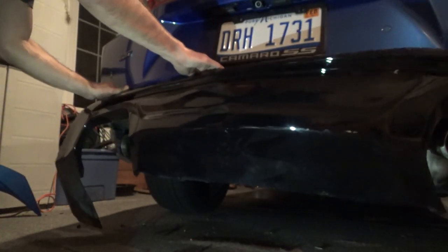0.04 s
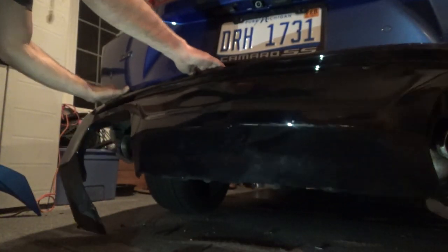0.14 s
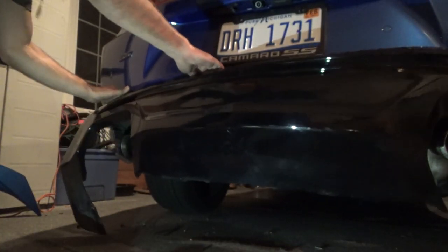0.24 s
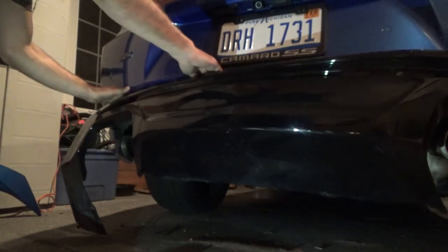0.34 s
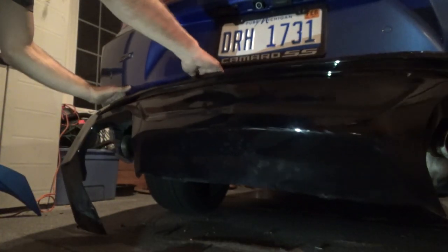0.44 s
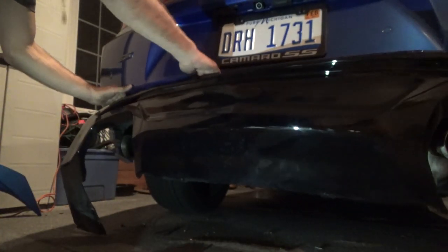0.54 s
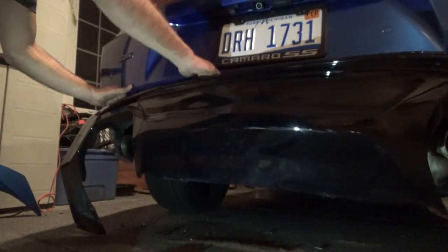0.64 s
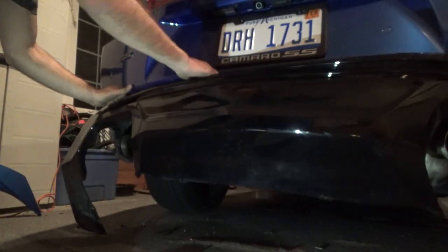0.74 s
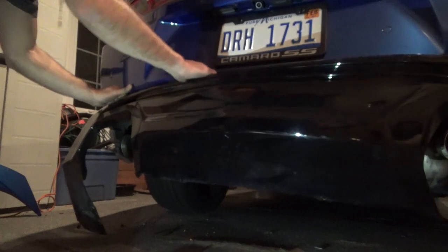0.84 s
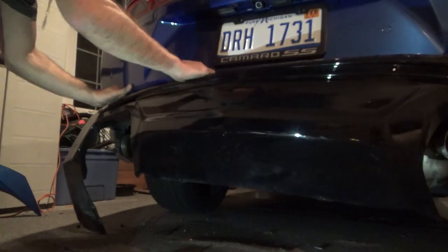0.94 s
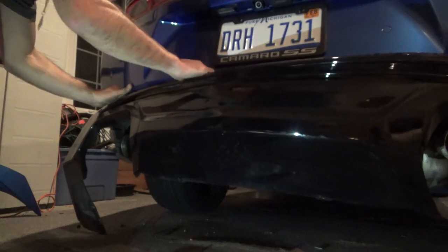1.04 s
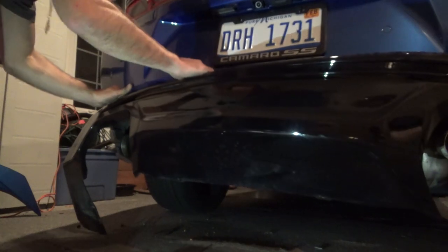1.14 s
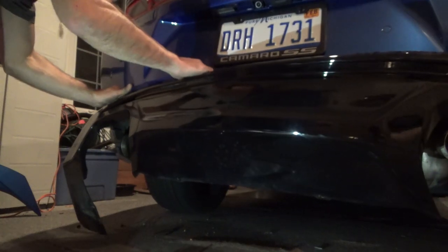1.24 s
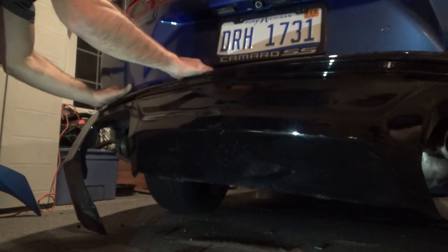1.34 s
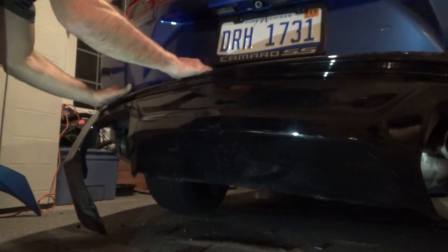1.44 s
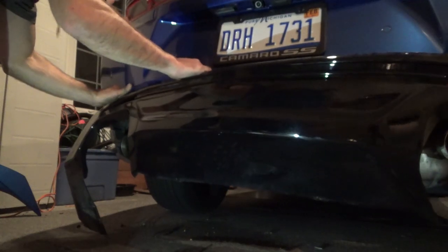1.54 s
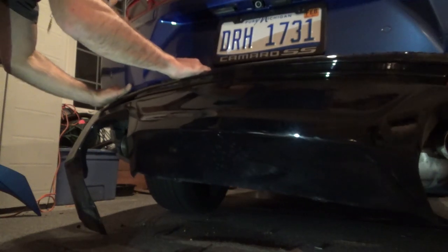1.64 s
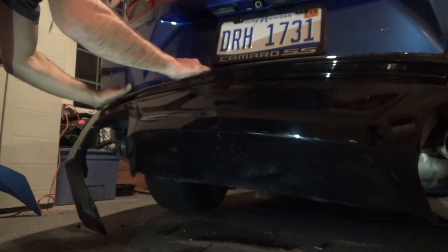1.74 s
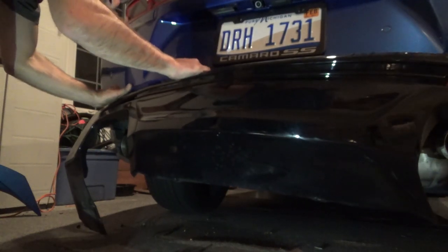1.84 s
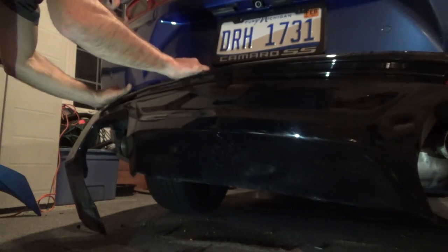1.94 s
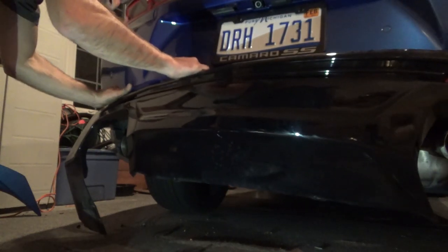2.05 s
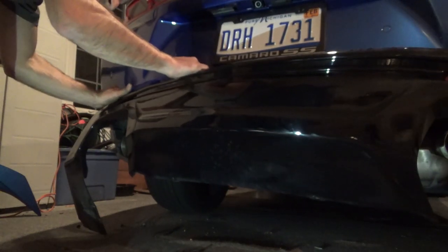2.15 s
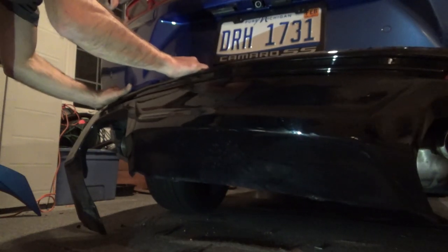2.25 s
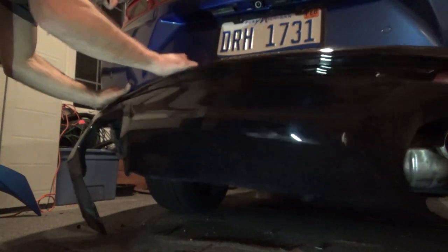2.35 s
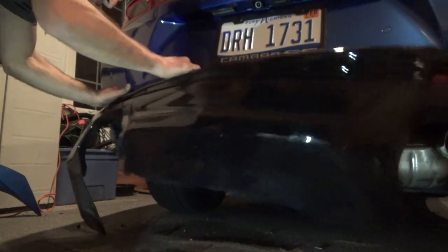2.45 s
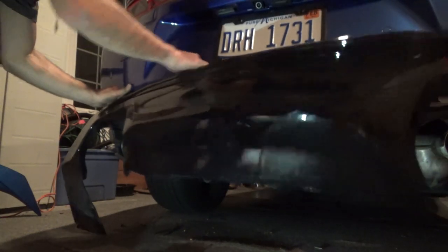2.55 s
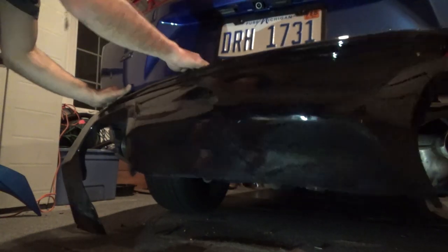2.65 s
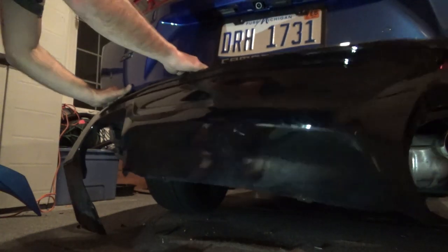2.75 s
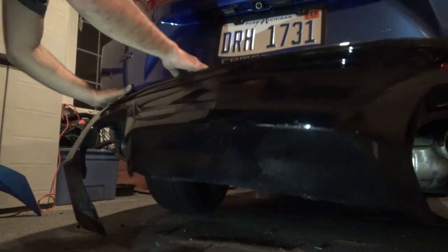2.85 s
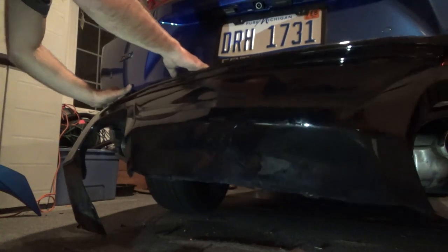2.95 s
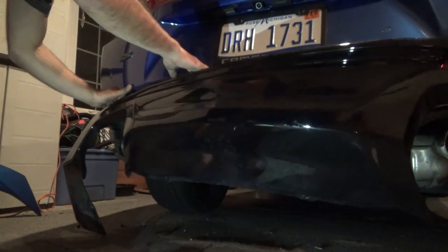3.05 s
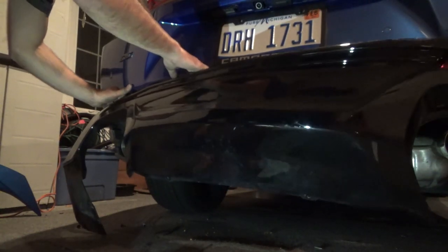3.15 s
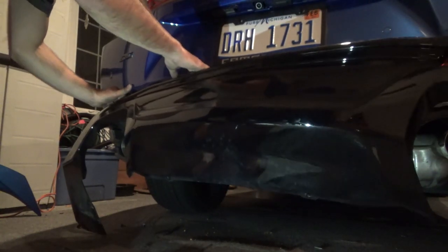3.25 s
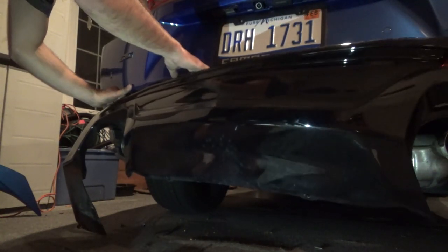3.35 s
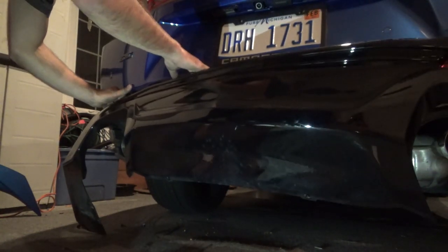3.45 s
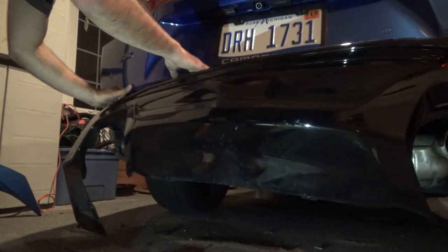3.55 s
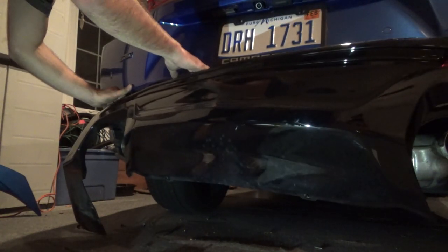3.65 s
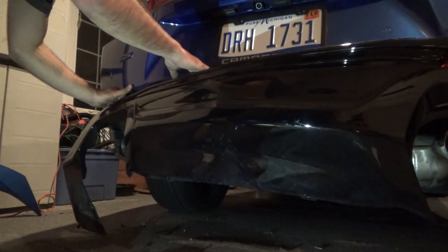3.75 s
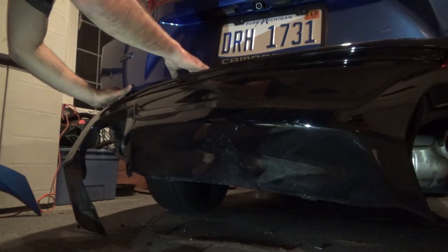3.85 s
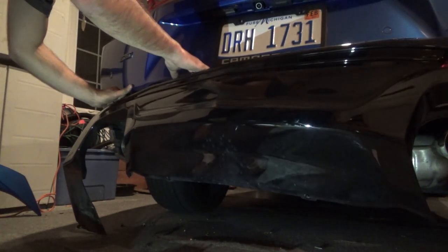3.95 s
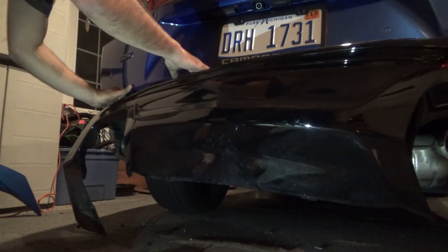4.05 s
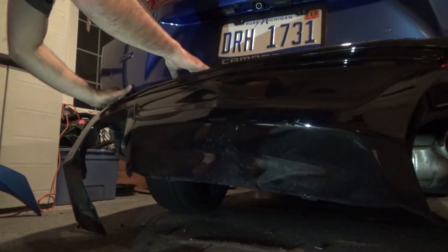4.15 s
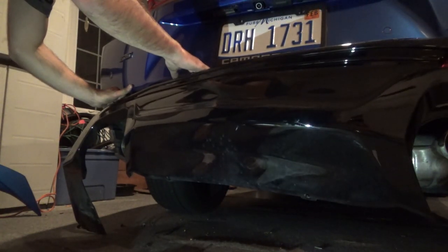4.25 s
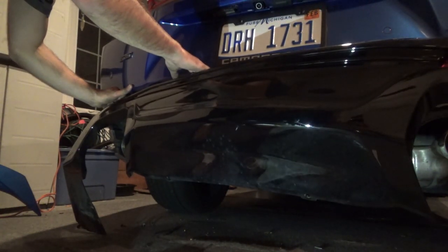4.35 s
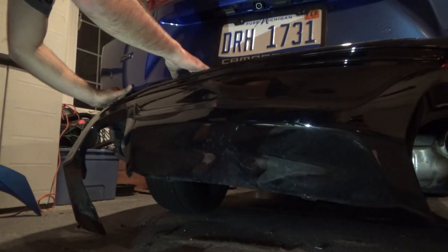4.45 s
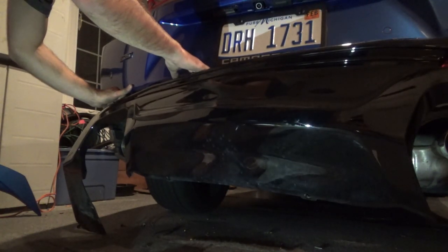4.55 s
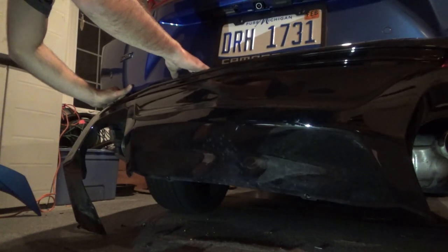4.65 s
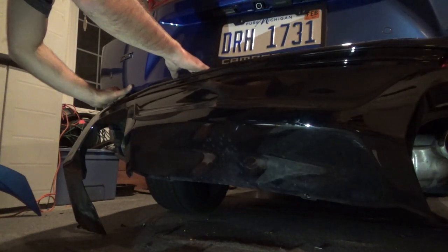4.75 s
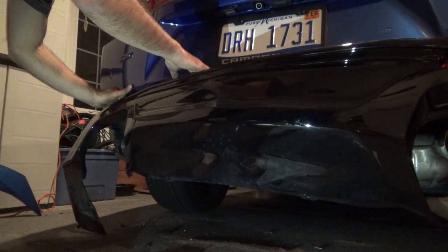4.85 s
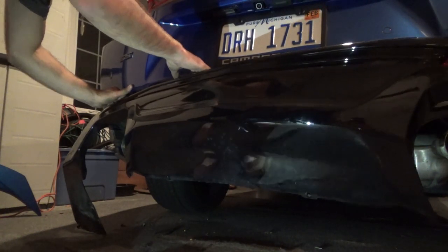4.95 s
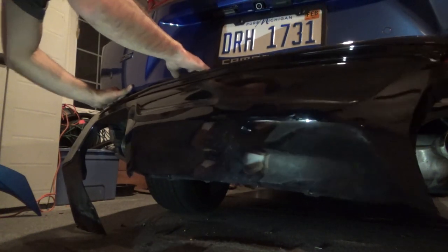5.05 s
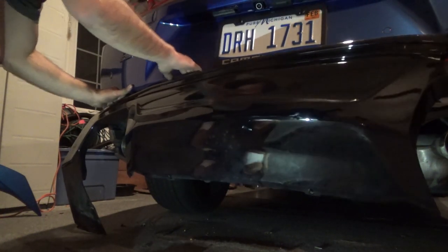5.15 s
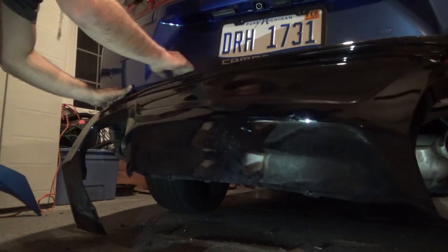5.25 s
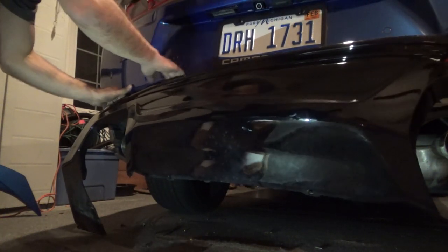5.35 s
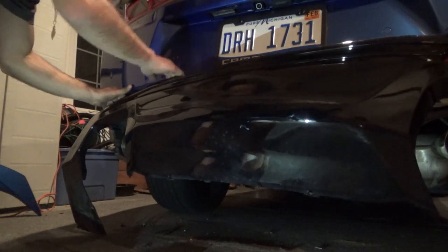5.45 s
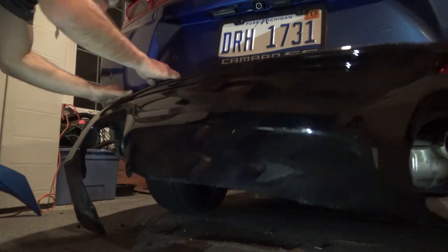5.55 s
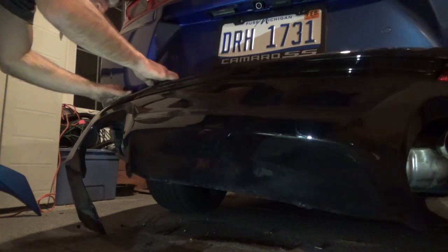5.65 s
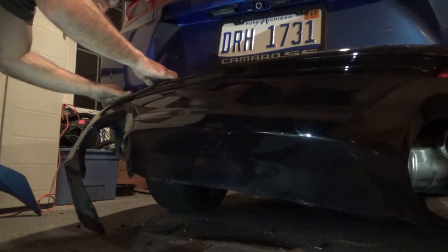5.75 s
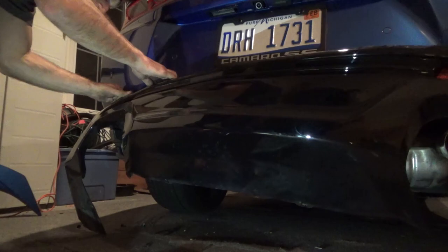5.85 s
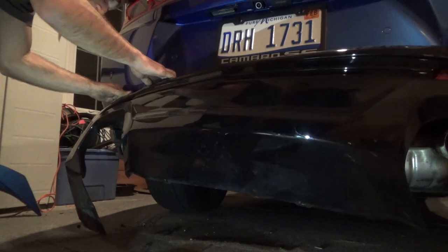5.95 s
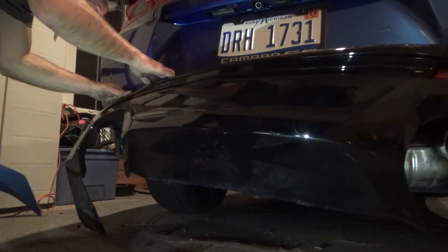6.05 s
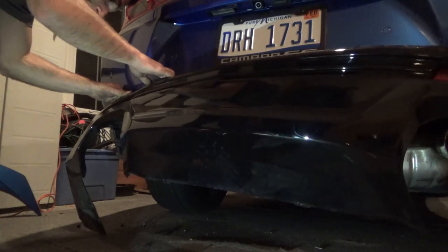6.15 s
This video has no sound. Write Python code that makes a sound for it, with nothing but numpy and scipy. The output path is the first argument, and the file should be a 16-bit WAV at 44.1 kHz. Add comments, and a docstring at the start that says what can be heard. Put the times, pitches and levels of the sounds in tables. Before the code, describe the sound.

Small creaks, hollow knocks and the rub of palms come from a nearby plastic bumper being worked off a car. A soft thump comes before a loud snap with a short boom and a quick slap. About two quiet seconds pass before more light knocking and scraping. The garage adds a short echo, with low room noise, a hum and very faint rapid chirping.

```python
"""A plastic bumper cover is worked loose by hand in a garage. Hands slide over it, the skin flexes with
soft booms, and its edge creaks, knocks and scrapes on the body. A row of clips lets go in one loud
snap: the skin pops and booms, the panel shudders and slaps back. Lighter handling follows.
Behind it sit quiet room noise, a hum and a faint, fast, regular chirping."""
import sys
import numpy as np
from scipy import signal
from scipy.fft import rfft, irfft
from scipy.io import wavfile

SR = 44100
rng = np.random.default_rng(int(sys.argv[2]) if len(sys.argv) > 2 else 0)


def store_wav(level_fs):
    """Save 16-bit WAV to argv[1]."""
    pcm = np.round(np.clip(np.atleast_2d(level_fs), -1, 1) * 32767)
    wavfile.write(sys.argv[1], SR, pcm.T.astype(np.int16))


N = 273420

# the five ranges in which the panel rings: low/Hz, high/Hz, relative ring time
RING_RANGES = [(145, 437, 1.5), (395, 1010, 0.86), (1100, 2960, .92), (3100, 6640, 0.88),
               (6490, 14000, 1.17)]


def from_db(db):
    """Decibels to gain."""
    return 10 ** (np.asarray(db) / 20)


def rms_one(x):
    """Scale to unit rms."""
    return x / np.sqrt(np.mean(x ** 2) + 1e-20)


def band(x, low, high):
    """Band-pass that keeps the power of white noise."""
    sos = signal.butter(3, [low, high], "band", fs=SR, output="sos")
    return signal.sosfilt(sos, x + 1e-18) * np.sqrt(SR / 2 / (high - low))


def resonate(x, hz, width_hz):
    """One resonance with unity gain at its peak."""
    r = np.exp(-np.pi * width_hz / SR)
    feedback = [1, -2 * r * np.cos(2 * np.pi * hz / SR), r * r]
    return signal.lfilter(np.array([1, 0, -1]) * (1 - r * r) / 2, feedback, x)


def narrow_noise(hz, width_hz):
    """A wavering tone of twice-resonated noise; rms 1."""
    return rms_one(resonate(resonate(rng.standard_normal(N), hz, width_hz), hz, width_hz))


def at_hz(points, hz):
    """Read a curve on a log-frequency axis."""
    freqs, values = np.transpose(points)
    return np.interp(np.log(hz + 1), np.log(freqs), values)


def stereo(mid, side, alike):
    """Two channels of a given likeness (-1 to 1) from two unrelated signals."""
    alike = np.clip(alike, -1, 1)
    return (np.sqrt(1 + alike) * mid + np.sqrt(1 - alike) * side * np.array([[1], [-1]])) / np.sqrt(2)


def add(track, s, sound):
    """Mix a sound into a track at time s."""
    at = max(round(s * SR), 0)
    track[..., at:at + sound.shape[-1]] += sound[..., :N - at]


def grains(per_s, spread_db, smooth):
    """Tiny slips of uneven size over a share of smooth friction noise; rms 1."""
    slips = (rng.random(N) < per_s / SR) * rng.choice([-1, 1], N)
    sizes = from_db(spread_db * np.clip(rng.standard_normal(N), -2, 2))
    return rms_one(rms_one(slips * sizes) + smooth * rng.standard_normal(N))


def tint(kind, k, tilt):
    """Level in dB of ring range k: the colour of the contact, tilted in dB per octave about 1800 Hz."""
    # colour of each kind of contact: level/dB in each ring range, low to high
    colours = {"click": (-7, 3, -1, -4, 0.5), "knock": (-2, -1, -21.5, -13.5, -20),
               "creak": (-3, -6, 0.5, -14.5, -24), "snap": (-1, 0.5, -1, -2.5, -3.3),
               "slap": (-5, 1, 1.5, -8, -17), "rub": (3, 2, -0.5, -1.5, -2)}
    low, high, _ = RING_RANGES[k]
    return colours[kind][k] + tilt * np.log2(np.sqrt(low * high) / 1800)


def strikes(hits, kind, ring_s, crack_s, buzz_per_s, smooth, damping):
    """Each blow is a sharp crack, then the dying buzz of the plastic; damping dries the treble most."""
    out, t = np.zeros(N), np.arange(SR // 2) / SR
    for k, (low, high, ring) in enumerate(RING_RANGES):
        power, cracks = np.zeros(N), np.zeros(N)
        t60 = ring_s * ring / (1 + damping * low / RING_RANGES[-1][0])
        for s, level_db, tilt in hits:
            gain = from_db(level_db + tint(kind, k, tilt))
            add(power, s, gain ** 2 * np.exp(-2 * np.log(1000) * t / t60))
            add(cracks, s, np.array([gain * np.sqrt(crack_s * SR)]))   # the energy of crack_s of buzz
        buzz = np.sqrt(power) * grains(buzz_per_s, 2.0, smooth)
        out += band(buzz + cracks, low, high)
    return out


def swings(bends, octave_db):
    """The skin swings for a few cycles, damped by the hands; bending adds a weak octave."""
    out, t = np.zeros(N), np.arange(SR // 10) / SR
    for s, peak_db, hz, length_s in bends:
        swell = np.sin(np.pi * np.minimum(t / length_s, 1))
        phase = 2 * np.pi * hz * t
        tone = np.sin(phase) + from_db(octave_db) * np.sin(2 * phase)
        add(out, s, -from_db(peak_db) * swell * tone)
    return out


def room_noise():
    """A steady bed of air and hiss, with a hum and a few thin whines."""
    # spectrum of the air: f/Hz, relative level/dB
    air_curve = [(15, -22.5), (45, -7), (80, -4), (250, -1.5), (600, -5), (1200, -5), (2000, -10),
                 (3500, -11.5), (5000, -15), (9000, -17.5), (15500, -22.5)]
    # stereo image of the air: f/Hz, left-right likeness
    likeness = [(60, 0.98), (180, 0.98), (550, 0.18), (1650, 0.2), (4970, 0.43), (15000, 1)]
    # hum and whines: f/Hz, width/Hz, level/dB
    tones = [(149.9, 8, -76), (924, 17, -86.5), (1131, 25, -78), (1440, 28, -85), (1580, 25, -88.5),
             (7100, 400, -81)]
    hz = np.arange(N // 2 + 1) * SR / N
    white = stereo(*rfft(rng.standard_normal((2, N))), at_hz(likeness, hz))
    air = rms_one(irfft(white * from_db(at_hz(air_curve, hz)), N))
    hum = sum(from_db(db) * narrow_noise(f, width) for f, width, db in tones)
    return from_db(-63) * air + hum


def chirp(hz, glide_hz, glide_s, length_s):
    """One tiny chirp that falls onto its pitch."""
    t = np.arange(SR // 50) / SR
    phase = 2 * np.pi * np.cumsum(hz + glide_hz * np.exp(-t / glide_s)) / SR
    return np.sin(phase) * np.sin(np.pi * np.minimum(t / length_s, 1)) ** 2


def chirping(per_s, skip_chance):
    """Regular chirps, each led in by a fainter, higher flick; now and then only the flick sounds."""
    out = np.zeros(N)
    tone = from_db(-58.5) * chirp(hz=3336, glide_hz=700, glide_s=.001, length_s=.013)
    flick = from_db(-65) * chirp(hz=3800, glide_hz=200, glide_s=.0041, length_s=.0053)
    for s in np.arange(.0097, N / SR, 1 / per_s):
        add(out, s, tone * (rng.random() > skip_chance) + flick * from_db(rng.normal(0, 2.7)))
    return out


def clip_clicks():
    """The clips click, sharp and dry."""
    # clicks: t/s, level/dB, tilt/(dB per octave)
    hits = [(0.0465, -41.5, -0.2), (0.213, -63, 0), (0.378, -56.5, 0), (1.749, -59, 1.8), (2.705, -62, 2),
            (5.0525, -54, 0.3), (5.07, -71, -1), (5.082, -50.5, -1.2), (5.2435, -52, -1.5)]
    return strikes(hits, "click", ring_s=.024, crack_s=.0012, buzz_per_s=1500, smooth=.58, damping=.82)


def scrapes(rise_s, fall_s, slips_per_s):
    """Stick-slip strokes over light rubbing: a rasp below, the smoother hiss of palms on paint on top."""
    # strokes of palms and plastic edges: t/s, length/s, level/dB, tilt/(dB per octave)
    strokes = [(0.325, 0.02, -52.5, 2.1), (0.383, 0.031, -60.5, -3), (0.449, 0.038, -54.5, 1.7),
               (0.533, 0.046, -63, 1.8), (0.649, 0.04, -59.5, 1.2), (0.715, 0.042, -61.5, -1),
               (1.577, 0.051, -62, -2), (2.899, 0.035, -73, 3.5), (5.123, 0.055, -73.5, 3.2),
               (5.325, 0.055, -67, 4), (5.375, 0.026, -59, 0.1), (5.446, 0.042, -62, 0),
               (5.544, 0.033, -59, -2.5), (5.615, 0.035, -62, -3.5)]
    # rubbing of the pressing hands, one curve before the snap and one after: t/s, level/dB
    grip_curves = [
        [(0.05, -86), (0.2, -65.5), (0.62, -69), (0.8, -62.5), (0.92, -71), (1.06, -70), (1.25, -88)],
        [(4.95, -78.5), (5.4, -71.5), (5.67, -70.5), (5.75, -84)],
    ]
    out, t = np.zeros(N), np.arange(SR // 4) / SR
    rasp, hiss = grains(slips_per_s, 3.4, smooth=.39), grains(4000, 3.0, smooth=1.0)
    grip = sum(np.interp(np.arange(N) / SR, s, from_db(db), left=0, right=0)
               for s, db in map(np.transpose, grip_curves))
    for k, (low, high, _) in enumerate(RING_RANGES):
        stroking = np.zeros(N)
        for s, length_s, level_db, tilt in strokes:
            envelope = (1 - np.exp(-t / rise_s)) * np.exp(-np.maximum(t - length_s, 0) / fall_s)
            add(stroking, s, from_db(level_db + tint("rub", k, tilt)) * envelope)
        pressure = np.hypot(stroking, grip * from_db(tint("rub", k, tilt=-.5)))
        friction = hiss if k == len(RING_RANGES) - 1 else rasp
        out += band(pressure * friction, low, high)
    return out


def skin_flexes(hz, length_s):
    """The skin flexes with soft booms, always at its own pitch."""
    # flexes: t/s, level/dB
    bends = [(0.054, -46), (0.302, -39), (0.513, -43), (0.927, -48.5), (1.279, -54), (1.419, -57.5),
             (1.586, -28.5), (1.905, -51.5), (1.996, -52), (2.044, -52), (2.247, -55), (2.544, -38.5),
             (3.103, -57.5), (3.236, -58), (5.145, -47), (5.511, -49)]
    return swings([(s, db, hz, length_s) for s, db in bends], octave_db=-21)


def edge_creaks():
    """The edge slips in short, grainy creaks."""
    # creaks: t/s, level/dB, tilt/(dB per octave)
    hits = [(0.287, -57.5, -1), (0.409, -54.5, 4), (0.509, -50.5, -2.5), (0.726, -50, 2), (0.741, -52, 3),
            (0.793, -55.5, 1.5), (0.827, -55.5, 3), (1.361, -60, 3), (5.383, -50.5, 3), (5.404, -52.5, -2),
            (5.4455, -48.5, 0.6), (5.457, -52.5, 0.5), (5.557, -42.5, 0), (5.572, -50, -1.5),
            (5.603, -45, -0.2)]
    return strikes(hits, "creak", ring_s=.072, crack_s=.00082, buzz_per_s=1500, smooth=.52, damping=.7)


def edge_knocks():
    """The loose edge knocks hollowly on the body."""
    # knocks: t/s, level/dB, tilt/(dB per octave)
    hits = [(0.3035, -54, 2), (0.3355, -47, 0.8), (0.4935, -49.5, 0.5), (0.523, -46.5, -0.5),
            (5.083, -50, 0), (5.2435, -39, 0), (5.4035, -46.5, -0.8)]
    return strikes(hits, "knock", ring_s=.11, crack_s=.0013, buzz_per_s=1500, smooth=.7, damping=.65)


def clip_snap(start_s, count, first_gap_s, gap_growth, loss_db):
    """The row of clips unzips in a slowing, weakening run, heard as one snap."""
    turn = np.arange(count)
    gaps = first_gap_s * gap_growth ** turn
    times = start_s + np.cumsum(gaps) - gaps
    hits = [(s, -20.5 - loss_db * k, 0) for k, s in enumerate(times)]
    return strikes(hits, "snap", ring_s=.21, crack_s=.001, buzz_per_s=2800, smooth=.9, damping=0)


def skin_pops():
    """The skin pops as it buckles."""
    # pops: t/s, level/dB, f/Hz, length/s
    buckles = [(2.3405, -10.5, 740, 0.0026), (2.3665, -9, 640, 0.0037)]
    return swings(buckles, octave_db=-20)


def skin_boom(start_s, stop_after_s, fade_s, slack, tighten_s):
    """The freed skin booms until the hands stop it, starting flat and rising as it pulls taut."""
    # lowest modes of the skin: f/Hz, level/dB
    modes = [(268, -14.5), (398, -26), (438, -26.5), (640, -25.5), (975, -29)]
    t = np.maximum(np.arange(N) / SR - start_s, 0)
    envelope = np.clip(t / fade_s, 0, 1) * np.clip(1 - (t - stop_after_s) / fade_s, 0, 1)
    bent_time = t - slack * tighten_s * (1 - np.exp(-t / tighten_s))
    return envelope * sum(from_db(db) * np.sin(2 * np.pi * hz * bent_time) for hz, db in modes)


def panel_slaps():
    """The freed panel slaps back, once hard and then lightly."""
    # slaps: t/s, level/dB, tilt/(dB per octave)
    hits = [(2.461, -23, 0.2), (2.619, -46, -2.5), (2.631, -48.5, -3), (2.686, -52.5, -1.5),
            (2.752, -57.5, -1.5)]
    return strikes(hits, "slap", ring_s=.098, crack_s=.0003, buzz_per_s=2800, smooth=.98, damping=0)


def shell(x, modes):
    """The plastic lifts or swallows the sound around its resonances."""
    for hz, width_hz, lift_db in modes:
        x = x + (from_db(lift_db) - 1) * resonate(x, hz, width_hz)
    return x


def shudder(x, hz, width_hz, follow_s):
    """The whole cover sways at a low pitch, as strongly as it is shaken."""
    r = np.exp(-1 / (follow_s * SR))
    shaking = np.sqrt(signal.lfilter([1 - r], [1, -r], x ** 2))
    return shaking * narrow_noise(hz, width_hz)


def garage(x, build_s):
    """Direct sound, two dull near reflections and a short diffuse tail."""
    # reflections off the nearby wall and floor: delay/s, left gain, right gain
    echoes = [(.0021, 0.12, -0.02), (0.023, .2, 0.17)]
    # reverb tail: low/Hz, high/Hz, t60/s, level/dB, left-right likeness
    tail_bands = [(40, 400, 0.29, -16, 1), (385, 1700, 0.5, -7.5, 0.77), (1150, 4500, .4, -6, 0.65),
                  (4500, 9200, 0.45, -6.5, 0.95), (10490, 16000, .3, -9, .9)]
    t = np.arange(SR) / SR
    response = np.zeros((2, SR))
    for delay_s, *gains in echoes:
        response[:, round(delay_s * SR)] += gains
    response = signal.sosfilt(signal.butter(2, 5000, fs=SR, output="sos"), response + 1e-18)
    response[:, 0] += 1   # direct sound
    for low, high, t60, level_db, alike in tail_bands:
        envelope = np.exp(-np.log(1000) * t / t60) * (1 - np.exp(-t / build_s))
        tail = stereo(*rng.standard_normal((2, SR)), alike) * envelope / np.sqrt(np.sum(envelope ** 2))
        response += from_db(level_db) * band(tail, low, high) * np.sqrt((high - low) / (SR / 2))
    return signal.fftconvolve(x[None], response, axes=1)[:, :N]


def spread(x, side_db, arrival_s, band_hz):
    """The cover is wide: above the bass, its far ends reach the two ears differently."""
    t = np.arange(SR // 10) / SR
    paths = rng.standard_normal(len(t)) * np.exp(-t / arrival_s)
    paths /= np.sqrt(np.sum(paths ** 2))
    paths = signal.sosfilt(signal.butter(2, band_hz, "band", fs=SR, output="sos"), paths)
    side = from_db(side_db) * signal.fftconvolve(x.mean(axis=0), paths)[:N]
    return x + side * np.array([[1], [-1]])


def scene():
    """Contacts ring through the plastic and join the booming skin in the garage, over the room bed."""
    # hollow modes of the loose edge: f/Hz, width/Hz, lift/dB
    edge_modes = [(352.6, 12, 7), (491, 33, 7), (587, 37, 6), (986, 36, 2), (1470, 98, 5.5),
                  (1682, 33, 5.5), (2012, 43, 7), (2586, 77, 6.5), (2880, 75, 0), (4970, 260, 2.5)]
    # resonances of the whole panel: f/Hz, width/Hz, lift/dB
    panel_modes = [(232, 37, 7.5), (425, 50, 0), (682, 60, 3.5), (930, 90, 0), (1180, 200, -2.5),
                   (1380, 270, 0.5), (2650, 240, -1.5), (3804, 1000, 4), (5780, 1100, -4), (8360, 3500, -2),
                   (11980, 3000, 3.5)]
    contacts = from_db(-1.5) * (clip_clicks() + edge_knocks() + edge_creaks())
    snap = clip_snap(start_s=2.3395, count=6, first_gap_s=.0058, gap_growth=1.35, loss_db=2)
    release = from_db(-2.15) * snap + from_db(-1.8) * panel_slaps()
    rubs = from_db(-3.5) * scrapes(rise_s=.0024, fall_s=.0078, slips_per_s=550)
    handling = shell(contacts + rubs, edge_modes)
    sway = shudder(from_db(-20.5) * handling + from_db(-22) * release, hz=72, width_hz=30, follow_s=.04)
    panel = shell(handling + release, panel_modes) + sway
    boom = skin_boom(start_s=2.347, stop_after_s=.058, fade_s=.005, slack=.12, tighten_s=.016)
    skin = from_db(3) * skin_flexes(hz=226.6, length_s=.024) + skin_pops() + boom
    lean_left = from_db([[1.0], [-1.0]])
    cover = garage(panel, build_s=.0022) + lean_left * garage(skin, build_s=.0091)
    cover = spread(cover, side_db=-11, arrival_s=.006, band_hz=[330, 8000])
    return cover + room_noise() + chirping(per_s=37.458, skip_chance=.052)


def record(dry):
    """Soft clipping rounds the loudest peaks and a steep low-pass cuts the very top."""
    ceiling, cutoff_hz = .53, 15750
    rounded = ceiling * np.tanh(dry / ceiling)
    return signal.sosfilt(signal.ellip(10, .1, 90, cutoff_hz, fs=SR, output="sos"), rounded)


dry = scene()
out = record(dry)
store_wav(out)
```